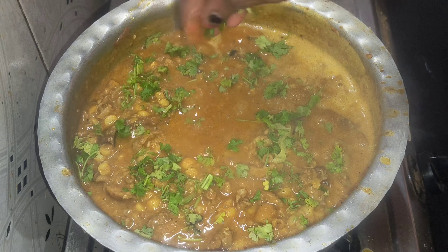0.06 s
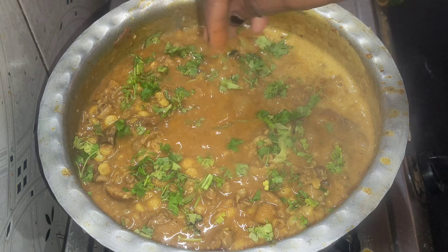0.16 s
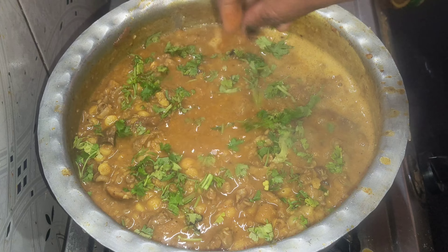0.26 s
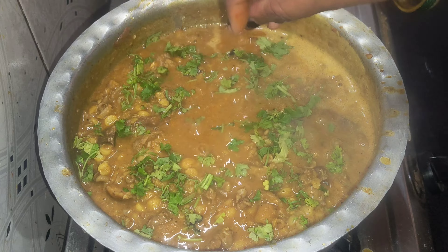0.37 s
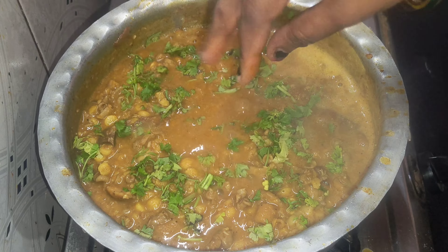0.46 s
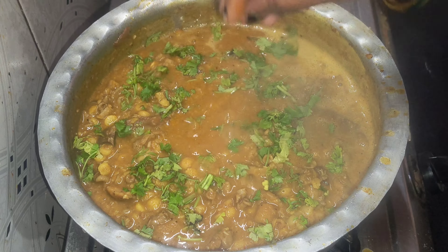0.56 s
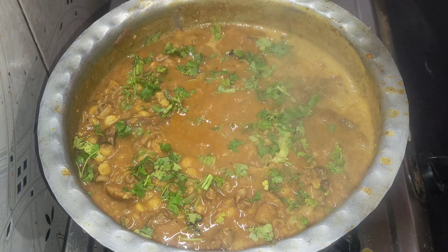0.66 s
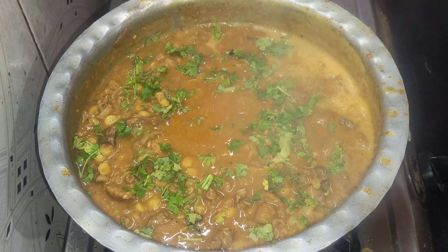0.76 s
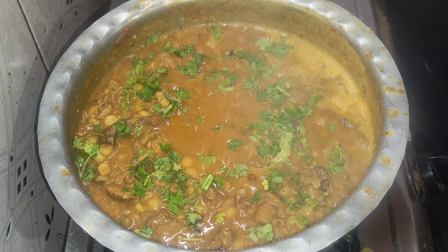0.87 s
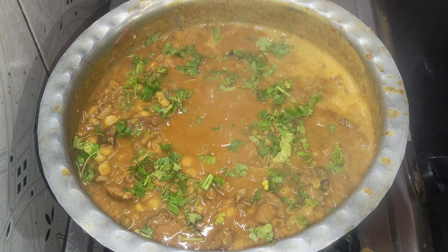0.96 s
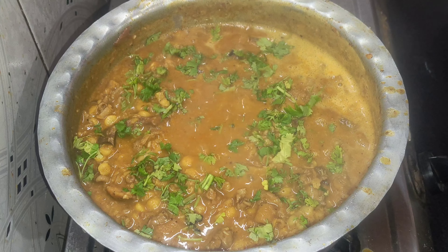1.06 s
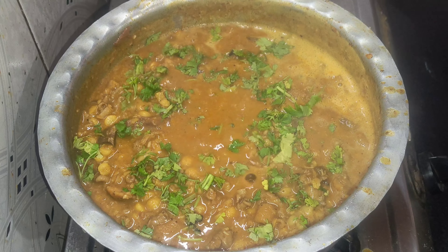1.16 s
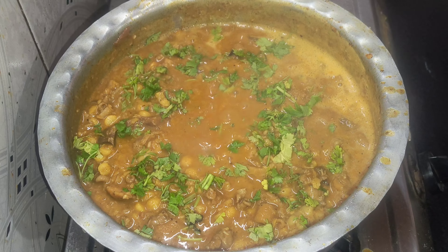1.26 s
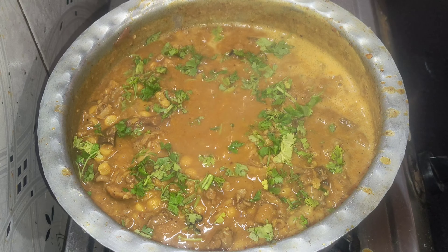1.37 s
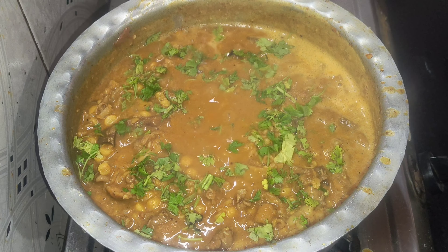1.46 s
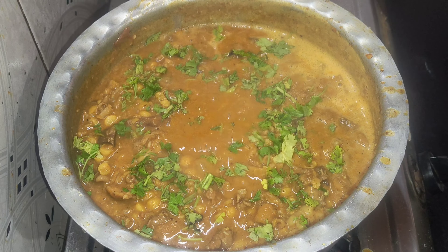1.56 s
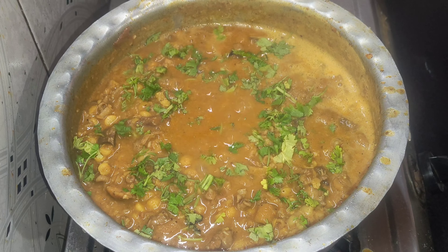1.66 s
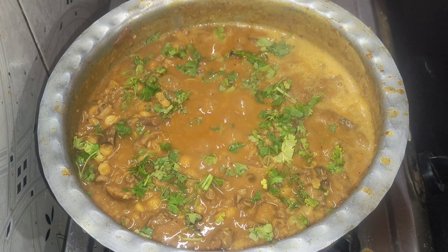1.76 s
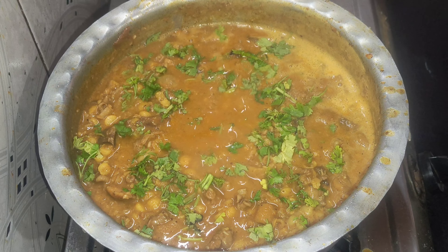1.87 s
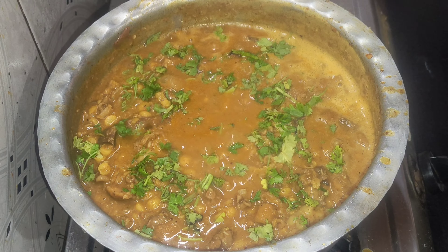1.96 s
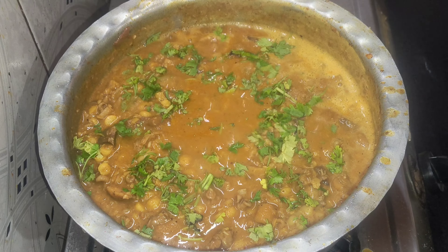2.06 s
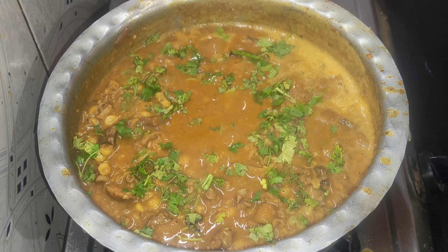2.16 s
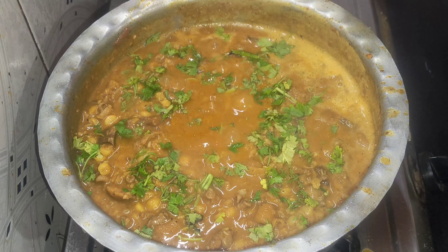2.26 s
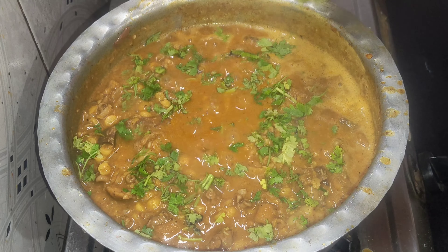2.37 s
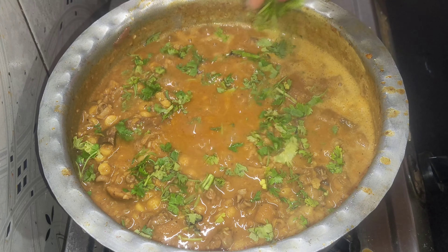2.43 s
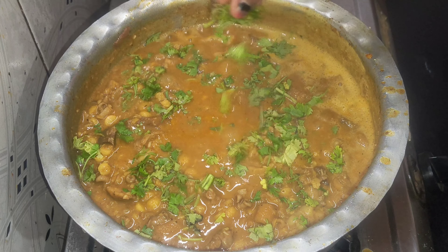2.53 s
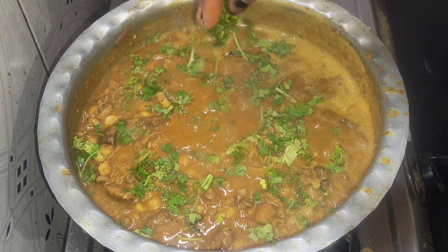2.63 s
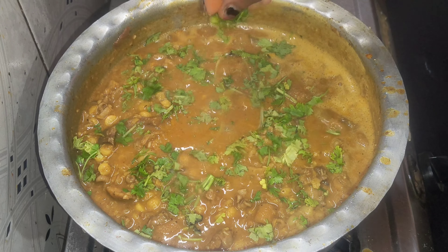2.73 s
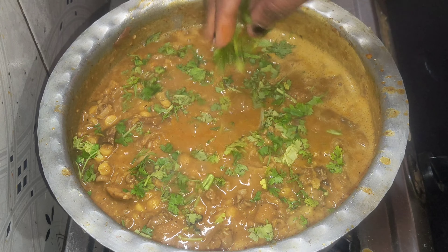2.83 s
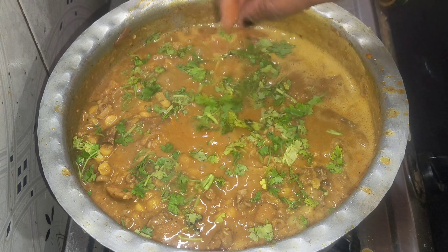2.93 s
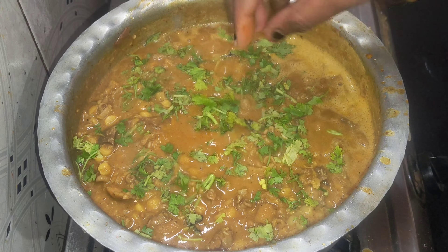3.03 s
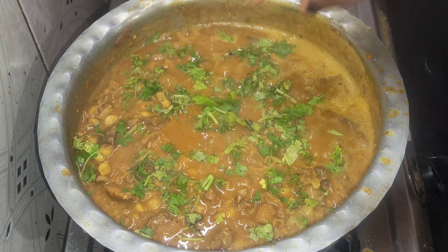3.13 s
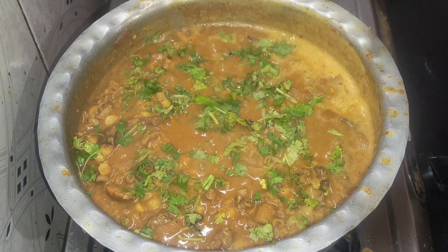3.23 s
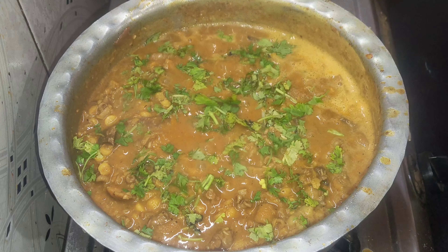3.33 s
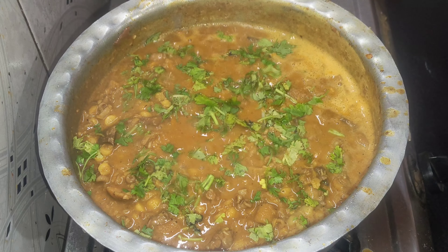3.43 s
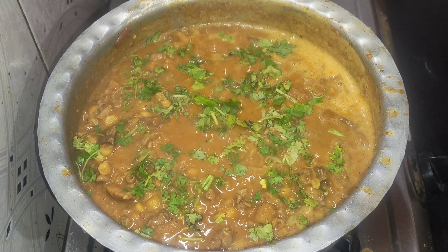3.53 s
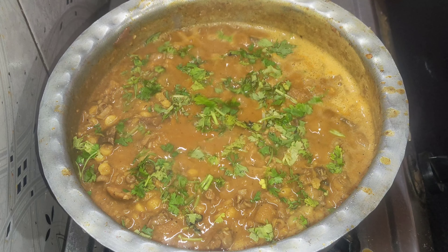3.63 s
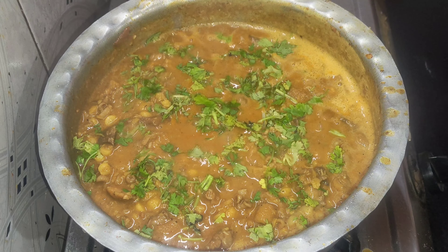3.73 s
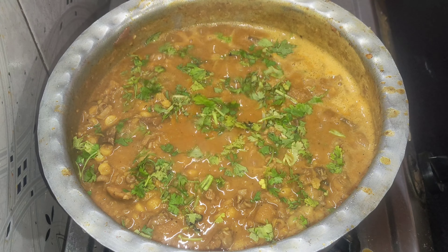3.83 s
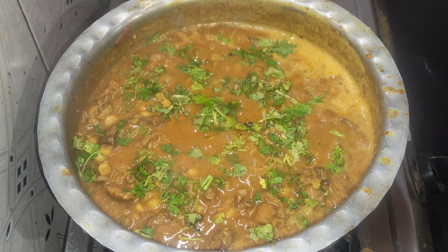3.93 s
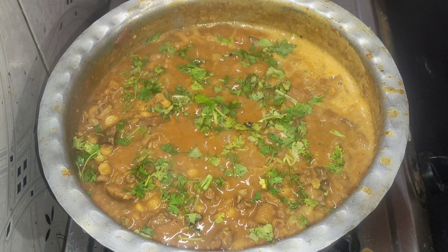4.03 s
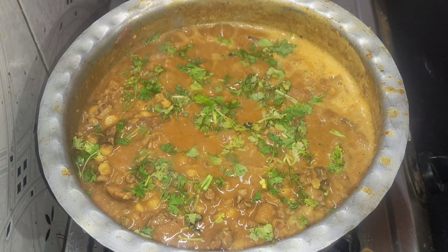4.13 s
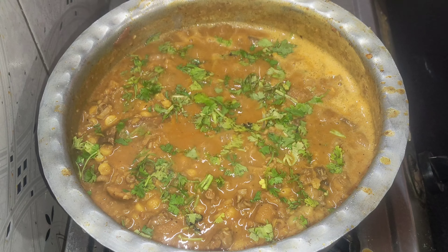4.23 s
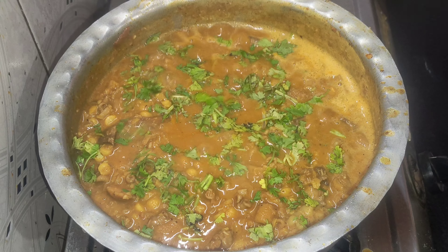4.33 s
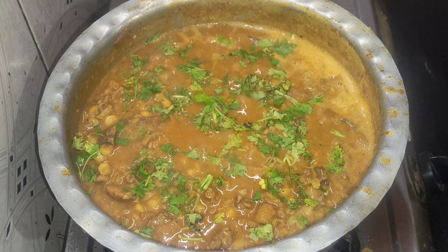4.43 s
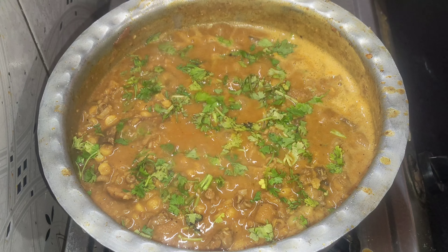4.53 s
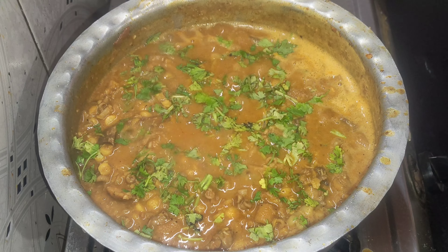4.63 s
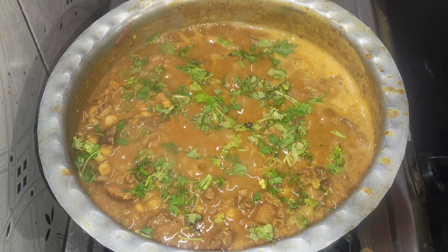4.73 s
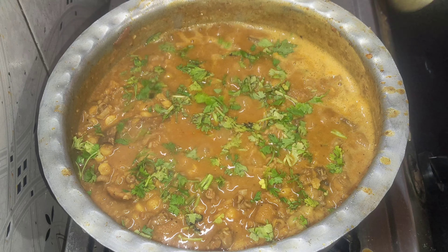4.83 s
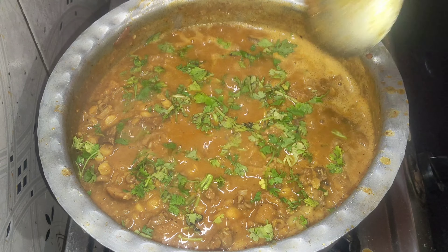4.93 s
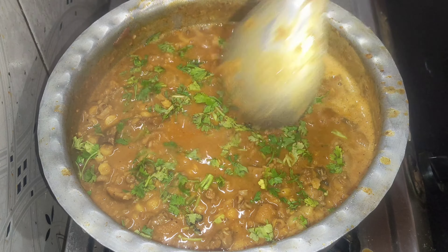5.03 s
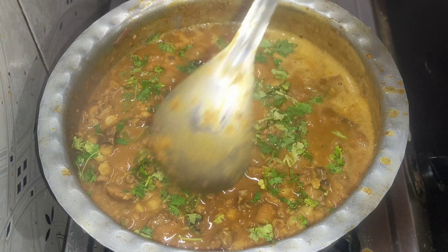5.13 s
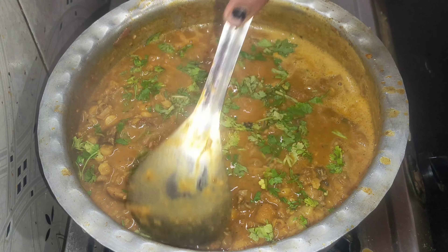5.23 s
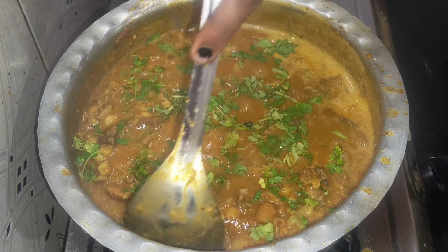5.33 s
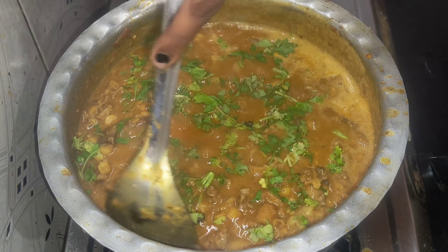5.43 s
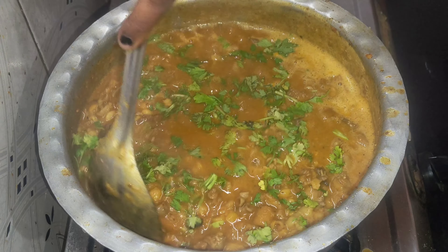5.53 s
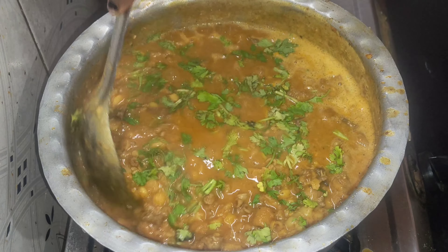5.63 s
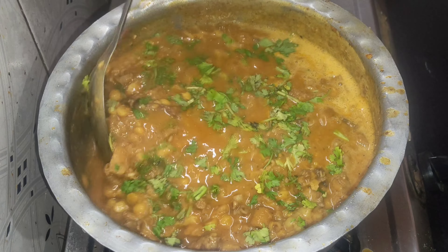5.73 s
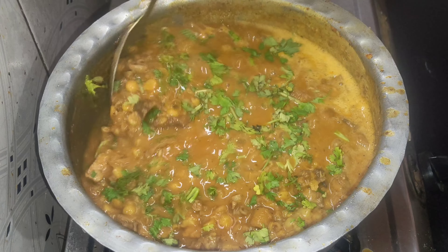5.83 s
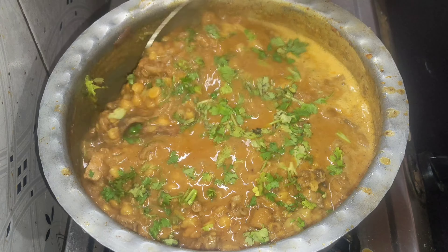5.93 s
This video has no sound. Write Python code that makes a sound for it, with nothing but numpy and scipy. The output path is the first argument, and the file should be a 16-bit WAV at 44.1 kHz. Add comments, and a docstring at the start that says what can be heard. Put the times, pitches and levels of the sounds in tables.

```python
"""Thick curry simmering in a kitchen

Bubbles plop in a wide metal pot and skins of gravy snap over a faint sizzle, rustling and burner rumble.
A dish is set down; a steel ladle leaves the counter, knocks the pot and starts to stir.
Bubbles are decaying sine glides; snaps, spatter and rustle are shaped noise.
Knocks are a noise crack plus ringing modes; all but the burner pass through short noise echoes."""
import sys
import numpy as np
from scipy import signal
from scipy.fft import rfft, irfft, next_fast_len
from scipy.io import wavfile

SR = 44100
rng = np.random.default_rng(int(sys.argv[2]) if len(sys.argv) > 2 else 0)


def transcribe(u):
    """Save the signal u as a 16-bit wav file named by the first command-line argument.

    u: samples, shape (n,) or (channels, n), limited to [-1, 1]; the rate is SR.
    q: integer samples, one column per channel.
    """
    v = np.clip(np.atleast_2d(u).T, -1, 1)
    q = np.round(v * 32767).astype(np.int16)
    wavfile.write(sys.argv[1], SR, q)


N = 264371
TIME_S = np.arange(N) / SR
EVENT_S = TIME_S[:SR // 2]  # time axis of one event

# spectrum of tearing films, shared by snaps and fizz: f/Hz, level/dB
SNAP_SPECTRUM = [(100, -21), (3000, -27.5), (6000, -6.5), (8000, 1), (16000, -14.5)]


def amp(db):
    """Decibels to gain."""
    return 10 ** (np.asarray(db) / 20)


def read(points, hz):
    """Interpolates a table of (f/Hz, value) on a log-frequency axis."""
    f, value = np.transpose(points)
    return np.interp(np.log(hz + 1), np.log(f + 1), value)


def colour(x, points):
    """Causal minimum-phase filter with the given spectrum (f/Hz, level/dB)."""
    size = 4096
    log_gain = np.log(amp(read(points, abs(np.fft.fftfreq(size, 1 / SR)))))
    response = np.exp(np.conj(signal.hilbert(log_gain)))
    taps = np.fft.ifft(response).real[:size // 2]
    return signal.oaconvolve(x, taps[None], axes=1)[:, :x.shape[1]]


def diffuse(size):
    """White noise at two microphone ports: alike in the bass, unrelated in the treble."""
    # left-right likeness: f/Hz, coherence
    likeness = [(60, 0.93), (150, 1), (300, 0.86), (640, 0.7), (1400, 0.38), (3000, 0)]
    full = next_fast_len(size)
    a, b = rfft(rng.standard_normal((2, full)))
    same = np.clip(read(likeness, np.fft.rfftfreq(full, 1 / SR)), -1, 1)
    mid = a * np.sqrt((1 + same) / 2)
    side = b * np.sqrt((1 - same) / 2)
    return irfft(np.array([mid + side, mid - side]), full)[:, :size]


def add(mix, start_s, sound, pan_db=0):
    """Mixes a sound in at start_s; positive pan_db favours the left."""
    part = mix[:, max(round(start_s * SR), 0):][:, :sound.shape[-1]]
    panned = amp([[pan_db / 2], [-pan_db / 2]]) * sound
    part += panned[:, :part.shape[1]]


def burst(decay_s, size=len(EVENT_S)):
    """A puff of noise that dies away exponentially."""
    return diffuse(size) * np.exp(-EVENT_S[:size] / decay_s)


def crackle(per_s, spread_db):
    """Random clicks of uneven size and side, rms 1."""
    size = amp(spread_db * np.minimum(rng.exponential(1, N), 4))
    struck = rng.random(N) < per_s / SR
    clicks = size * struck * rng.standard_normal((2, N))
    return clicks / (clicks.std() + 1e-12)


def plop(hz, ring_s, rise=0.19, swell_s=0.00087):
    """A bubble's cavity rings, gliding up through about hz as its mouth opens."""
    t = EVENT_S[:SR // 10]
    pitch_hz = hz * (1 + rise * (np.tanh(t / (2 * ring_s)) - .5))
    tone = np.sin(2 * np.pi * np.cumsum(pitch_hz) / SR)
    return tone * np.exp(-t / ring_s) * (1 - np.exp(-t / swell_s))


def swarm(low_hz, high_hz, cycles, per_s, spread_db, count=14):
    """A crowd of small bubbles of many pitches, each ringing for a few cycles; rms 1."""
    out = np.zeros((2, N))
    grains = []
    for hz in np.geomspace(low_hz, high_hz, count):
        grain = plop(hz, cycles / hz, swell_s=.5 / hz)
        grains.append(grain[:round(6 * cycles / hz * SR)])
    for when, kind, size, side in rng.random((round(per_s * N / SR), 4)):
        level = amp(-spread_db * np.log(size + 0.0055))
        add(out, when * N / SR, grains[int(kind * count)] * level, 10 * (side - .5))
    return out / out.std()


def burner(hum_hz=162, hum_width_hz=10, hum_db=-72):
    """Stove: steady coloured noise, plus a wavering drone of noise through a narrow resonance."""
    # rumble and hiss: f/Hz, level/dB
    roar = [(20, -55), (40, -45), (65, -42), (95, -45), (165, -47.5), (240, -44), (340, -60), (440, -53),
            (540, -48.5), (750, -55), (1200, -62), (2400, -66), (5000, -68.5), (16000, -62)]
    peak = signal.iirpeak(hum_hz, hum_hz / hum_width_hz, SR)
    drone = signal.lfilter(*peak, diffuse(N))
    return colour(diffuse(N), roar) + amp(hum_db) * drone / drone.std()


def sizzle(fizz_db=-73, pops_db=-78, blub_db=-73):
    """Tiny bubbles fizz and pop at the surface while vapour blubs deep down."""
    fizz = colour(crackle(per_s=210, spread_db=-1), SNAP_SPECTRUM)
    pops = swarm(2600, 9000, cycles=1.5, per_s=260, spread_db=3.3)
    blubs = swarm(70.7, 244, cycles=1.04, per_s=35, spread_db=1.5).mean(0)
    return amp(fizz_db) * fizz + amp(pops_db) * pops + amp(blub_db) * blubs


def stroke(start_s, length_s, attack_s=0.0063, release_s=0.012):
    """Envelope of one rustling stroke: attack, hold, release."""
    t = TIME_S - start_s
    return np.clip(t / attack_s, 0, 1) * np.exp(-np.maximum(t - length_s, 0) / release_s)


def handling(rim_db=-71, drag_rustle_db=-11.5, squish_db=-14):
    """Herbs and ladle rustle, gravy crackles at the hot rim; stirring squelches and squeezes out air."""
    # strokes of herbs and of the ladle being picked up: t/s, length/s, level/dB
    stroke_table = [(0.001, 0.017, -61.5), (0.415, 0.14, -67), (1.098, .2, -71), (1.506, 0.091, -61.5),
                    (2.69, 0.05, -67.5), (4.122, 0.074, -64.5), (4.813, .02, -55), (5.057, 0.05, -50.5),
                    (5.161, 0.034, -53.5)]
    # ladle dragging through thick gravy: t/s, level/dB
    drag = [(5.74, -76), (5.79, -59), (5.84, -46.5), (5.885, -48), (5.92, -44), (5.99, -43.5)]
    # spectra of leaves and metal, rim crackle, squelch: f/Hz, level/dB
    rustle_spectrum = [(100, -7), (1500, 1), (2800, -1), (5000, 1), (9000, 0.5), (16000, -1)]
    rim_spectrum = [(100, -5), (1500, -0.5), (2800, -1.5), (6000, 0.5), (16000, -1)]
    squelch_spectrum = [(40, -20), (160, -15), (400, -9), (550, 6), (900, -10.5), (1800, -1.5), (2800, -26),
                        (8000, -43)]
    effort = amp(np.interp(TIME_S, *np.transpose(drag), left=-120))
    strokes = sum(amp(db) * stroke(t, length_s) for t, length_s, db in stroke_table)
    rustle = strokes * crackle(per_s=3000, spread_db=2.0)
    rustle += amp(drag_rustle_db) * effort * crackle(per_s=900, spread_db=3.0)
    rim = amp(rim_db) * colour(crackle(per_s=900, spread_db=1.5), rim_spectrum)
    squelch = colour(effort * crackle(per_s=330, spread_db=2.5), squelch_spectrum)
    pockets = amp(squish_db) * effort * swarm(305, 2620, cycles=4.4, per_s=130, spread_db=0.0)
    return colour(rustle, rustle_spectrum) + rim + squelch + pockets


def snaps(snap_db=-1, snap_s=0.0011, smack_db=1, smack_s=0.0048, pan_db=2):
    """Films of gravy tear: a sharp snap inside a short smack; faint ones fall at random."""
    # clearest snaps: t/s, level/dB, smack/dB re level
    clear = [(0.014, -28.5, -32), (0.152, -45.5, -6), (0.3622, -32.5, -13.5), (0.3669, -28, -28),
             (0.448, -36.5, -19.5), (0.8396, -40.5, -33), (1.0957, -45, -2), (1.1818, -39, -37),
             (1.294, -32.5, -24), (1.3635, -30.5, -20.5), (1.927, -32, -22), (2.2499, -40, -20),
             (2.4889, -38, -21.5), (2.9726, -31, -24), (4.182, -44.5, -11.5), (4.4215, -39.5, -26),
             (4.766, -40.5, -16), (5.1683, -38.5, -14), (5.43, -30, -32), (5.665, -41.5, -9),
             (5.863, -34.5, -30), (5.97, -35, -19)]
    # dull smack: f/Hz, level/dB
    smack_spectrum = [(100, -7), (1500, 3.5), (4500, 6), (8000, -4), (16000, -25)]
    faint_per_s, faint_db, faint_spread_db, faint_smack_db = 5.4, -46.5, 0.5, -15.5
    faint = [(rng.uniform(0, N / SR), rng.normal(faint_db, faint_spread_db), faint_smack_db)
             for _ in range(round(faint_per_s * N / SR))]
    snap, smack = np.zeros((2, 2, N))
    swell = 1 - np.exp(-EVENT_S[:2048] / 0.00089)
    for t, db, dull_db in clear + faint:
        add(snap, t, amp(db + snap_db) * burst(snap_s, size=2048), pan_db)
        thud = burst(smack_s, size=2048) * swell
        add(smack, t - .001, amp(db + dull_db + smack_db) * thud, pan_db)
    return colour(snap, SNAP_SPECTRUM) + colour(smack, smack_spectrum)


def bubbles(plop_db=-3.5, ring_s=0.005, spatter_db=5, spatter_s=0.0093, gurgle_db=2, gurgle_s=0.014,
            open_s=0.0024, small_db=-76):
    """Large bubbles plop, gurgle and spatter among small ones; air in the pot's hollow resonates."""
    # large bubbles: t/s, level/dB, f/Hz, spatter/dB re level
    large = [(0.041, -51.5, 850, -22), (0.69, -54, 520, -19), (0.72, -50.5, 550, -7), (0.9, -63, 540, -21),
             (1.181, -45, 992, -28), (1.252, -52.5, 810, -11), (1.279, -59, 570, -5.5),
             (1.35, -57.5, 535, -10), (1.405, -48, 874, -15), (1.423, -56, 1005, -3.5),
             (1.517, -48.5, 977, -29), (1.572, -46, 604, -31), (1.87, -50.5, 590, -13),
             (1.925, -53, 528, -26), (2.047, -63.5, 543, 3.5), (2.134, -53, 530, -12),
             (2.291, -54.5, 503, -15), (2.472, -50, 545, -22), (2.638, -55.5, 546, -27),
             (2.675, -50.5, 516, -14), (2.921, -47, 646, -28), (3.038, -53.5, 1400, -9),
             (3.178, -53.5, 604, -19), (3.444, -52.5, 840, -15.5), (3.559, -46.5, 737, -19),
             (4.116, -51.5, 730, -11), (4.157, -56.5, 593, -3.5), (4.255, -52.5, 560, -21),
             (4.399, -50, 635, -20), (4.519, -51.5, 977, -26), (4.608, -54, 670, -20),
             (5.152, -51, 495, -7), (5.429, -47.5, 600, -33)]
    # spectra of spatter and gurgle: f/Hz, level/dB
    spatter_spectrum = [(100, -4), (500, -2), (1100, 11.5), (1500, 18), (1900, 10.5), (2400, -6),
                        (3500, -11), (9000, -13)]
    gurgle_spectrum = [(100, -35), (380, -7.5), (520, 3), (1050, 4.5), (1400, -11.5), (2400, -25),
                       (8000, -36)]
    # air resonances in the pot: f/Hz, width/Hz, gain of the added resonance/dB
    hollow = [(528, 30.5, 8), (616, 27, 6.5), (829, 39, 5.5), (992, 15, 7.5), (1373, 93, -8)]
    # smaller cavities, mostly higher, ring after the first plop as the crater closes
    after_count, after_span_s, after_db, after_octaves = 3, 0.032, -8.5, 0.31
    out, spatter, gurgle = np.zeros((3, 2, N))
    opening = 1 - np.exp(-EVENT_S[:4096] / open_s)  # steam pushes the thick skin open
    for t, db, hz, wet_db in large:
        add(out, t, amp(db + plop_db) * plop(hz, ring_s))
        for late, size in rng.random((after_count, 2)):
            after_hz = hz * 2 ** (after_octaves * (2 * size - .5))
            after = amp(db + plop_db + after_db) * plop(after_hz, ring_s)
            add(out, t + late * after_span_s, after)
        spray = burst(spatter_s, size=4096) * np.sqrt(opening)
        add(spatter, t, amp(db + wet_db + spatter_db) * spray)
        add(gurgle, t - .002, amp(db + gurgle_db) * burst(gurgle_s, size=4096) * opening)
    out += colour(spatter, spatter_spectrum) + colour(gurgle, gurgle_spectrum)
    out += amp(small_db) * swarm(low_hz=493, high_hz=1603, cycles=2.9, per_s=70, spread_db=2)
    resonance = sum(amp(db) * signal.lfilter(*signal.iirpeak(hz, hz / width_hz, SR), out)
                    for hz, width_hz, db in hollow)
    return out + resonance


def knocks(clatter_s=0.034, swell_s=0.0017, note_swell_s=0.0042):
    """Each contact is a noise crack, then the struck thing's decaying modes and clatter."""
    # contacts: t/s, thing, ring/dB, crack/dB, contact time/s, left-right/dB
    contacts = [ (3.6601, "dish", -27.5, -19, 0.004, -0.5), (3.7, "dish", -38, -33, 0.008, 0.5),
                (3.78, "dish", -69, -51, 0.003, 4), (3.856, "dish", -55.5, -47.5, 0.007, 10.5),
                (3.863, "dish", -49, -45.5, 0.0054, -4), (4.8, "counter", -40, -44, 0.0053, 0),
                (4.8156, "counter", -49, -33.5, 0.0031, 2), (5.051, "counter", -45.5, -43, 0.0026, -2),
                (5.2016, "ladle", -62, -29, 0.0017, -8.5), (5.205, "ladle", -47, -21, 0.0029, 1),
                (5.2068, "ladle", -29, -29, 0.001, 1.5), (5.248, "ladle", -52, -30.5, 0.0035, -1.5),
                (5.754, "pot", -28.5, -34, 0.0044, 0.5)]
    # modes by thing: f/Hz, level/dB, t60/s, left lead/rad
    modes = { "dish": [(133, -14, 0.11, 0), (166, -13, 0.15, -0.5), (219, -11, 0.17, -1),
             (283, -12, 0.23, 1.2), (335, -6.5, 0.14, 4), (525, 5, 0.083, 0.3), (558, -7, 0.1, 1),
             (780, -14, 0.17, -2.5), (853, -13, 0.11, 2.2), (1060, -6.5, .22, -2.5), (1145, -11, 0.21, 2),
             (1350, -11.5, 0.25, -3.5), (2020, -13, 0.13, -0.5), (2640, -20, 0.17, 0),
             (2860, -17, 0.26, -0.5), (2890, -18, 0.34, 2.5), (3040, -20, 0.21, 4), (3760, -14, 0.1, -1),
             (5850, -7, 0.077, -3)], "counter": [(161.5, -8, 0.44, -1.5), (236, -13, 0.2, 2.6),
             (340, -7, 0.14, 2), (421, -3, 0.21, 1.25), (513, -13, 0.18, 2)],
             "ladle": [(149.6, -16, 0.18, 0.5), (244, 1, 0.063, -0.5), (278, -20, 0.13, 3),
             (340, -10, 0.11, 2.5), (450, -5, 0.1, 1), (523, -7, 0.094, 2.5), (578, -11.5, 0.34, -0.5),
             (1370, -6, 0.057, -3), (1860, -28, 0.17, -8)], "pot": [(161.5, -12.5, 0.33, 0),
             (238, 4, 0.074, 0.054), (274, 5, 0.044, 0), (531, -2.5, 0.094, 1), (820, -5, 0.054, .5),
             (1070, -11, 0.097, 0), (1350, -10.5, 0.071, 0.54)]}
    # crowd of weaker modes by thing: f/Hz, level/dB
    clatter = { "dish": [(40, -5), (130, 1.5), (700, 6.5), (1200, 9), (2200, 0), (3000, 0.5), (4800, -6.5),
               (9000, -9.5), (16000, -9)], "counter": [(40, -11), (200, 11.5), (600, 10.5), (900, -3),
               (2500, -7), (7000, -0.5), (16000, -22)], "ladle": [(40, -12), (200, 4), (600, 7), (900, -6),
               (1400, -2), (2500, -4.5), (9000, -11), (16000, -33)], "pot": [(40, -14), (100, -1),
               (200, -5), (400, 1), (1000, 3.5), (1400, -5), (1900, -10.5), (5000, -17.5), (16000, -14.5)]}
    # crack before the contact-time tilt: f/Hz, level/dB
    crack_spectrum = [(100, -9), (700, 1.5), (1400, -3), (2200, -5), (3300, 5.5), (4800, -2.5), (6000, 5.5),
                      (8500, 5), (11000, 2.5), (16000, -9)]
    # rubs and pushes waking one mode of the rocking dish or stirred pot: t/s, level/dB, f/Hz, t60/s
    notes = [(3.856, -39.5, 5960, 0.034), (3.862, -44, 6940, 0.05), (3.8655, -31, 541.5, 0.076),
             (5.816, -39, 535, 0.15), (5.882, -35, 238, 0.071)]
    neutral_contact_s, dulling_db = 0.0031, 3  # dB/octave lost per doubling of contact time
    t = EVENT_S
    out = np.zeros((2, N))
    for start_s, thing, ring_db, crack_db, contact_s, pan_db in contacts:
        ring = colour(burst(clatter_s), clatter[thing])
        for k, (hz, db, t60_s, lead) in enumerate(modes[thing]):
            phase = 2 * np.pi * hz * t + [[lead / 2], [-lead / 2]]
            ring += (-1) ** k * amp(db - 60 * t / t60_s) * np.sin(phase)
        tilt_db = -dulling_db * np.log2(contact_s / neutral_contact_s)
        tilted = [(hz, db + tilt_db * np.log2(hz / 5000)) for hz, db in crack_spectrum]
        crack = colour(np.tanh(diffuse(len(t))) * np.exp(-(t / contact_s) ** 4), tilted)
        knock = amp(ring_db) * ring * (1 - np.exp(-t / swell_s)) + amp(crack_db) * crack
        add(out, start_s, knock, pan_db)
    for start_s, db, hz, t60_s in notes:
        note = amp(db - 60 * t / t60_s) * np.sin(2 * np.pi * hz * t)
        add(out, start_s, note * (1 - np.exp(-t / note_swell_s)))
    return out


def kitchen(x, wet_db, early_db):
    """Quick reflections from pot and tiled corner, then the room's short tail, as decaying noise."""
    # room decay: f/Hz, t60/s
    room_t60 = [(100, 0.23), (600, 0.59), (3000, 0.39), (9000, 0.34), (16000, 0.27)]
    size = len(EVENT_S)
    hz, t, z = signal.stft(diffuse(size), SR, nperseg=256)
    decay = amp(-60 * t / read(room_t60, hz)[:, None])
    tail = signal.istft(z * decay, SR, nperseg=256)[1][:, :size]
    tail *= 1 - np.exp(-EVENT_S / 0.0013)
    early = burst(0.007) * (EVENT_S > .001)
    echo = amp(wet_db) * tail / np.linalg.norm(tail[0])
    echo += amp(early_db) * early / np.linalg.norm(early[0])
    return x + signal.fftconvolve(x, echo, axes=1)[:, :N]


def scene(port_delay_samples=4):
    """Pot and burner, with the pot louder at left and the right port late, plus the knocks."""
    plops = kitchen(bubbles(), wet_db=-10.0, early_db=-5.5)
    crackles = kitchen(snaps() + sizzle() + handling(), wet_db=-5.5, early_db=-5.0)
    left, right = (plops + crackles) * amp([[.9], [-.9]]) + burner()
    stove = np.array([left, np.roll(right, port_delay_samples)])
    return stove + kitchen(knocks(), wet_db=-9.5, early_db=-11.5)


def record(dry, edge_hz=16200):
    """The microphone port rings in the high treble; then a linear-phase lowpass limits the band."""
    # microphone response: f/Hz, gain/dB
    microphone = [(20, -4.5), (5000, 0), (7200, 1), (8200, 5), (9150, 9.5), (9900, 4), (11000, -0.5),
                  (12500, -5), (16000, -8.5)]
    edge = signal.firwin(511, edge_hz, window=("kaiser", 9), fs=SR)
    return signal.oaconvolve(colour(dry, microphone), edge[None], "same", axes=1)


dry = scene()
out = record(dry)
transcribe(out)
```